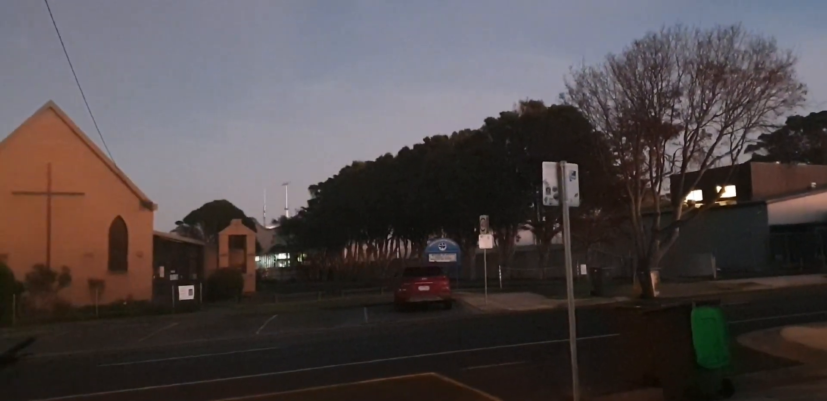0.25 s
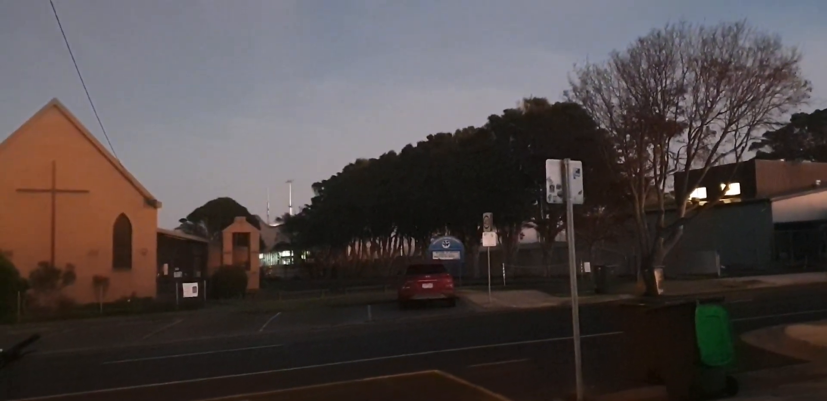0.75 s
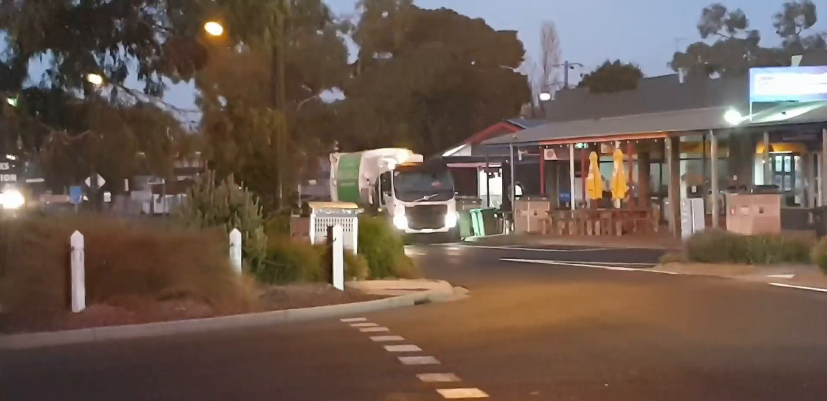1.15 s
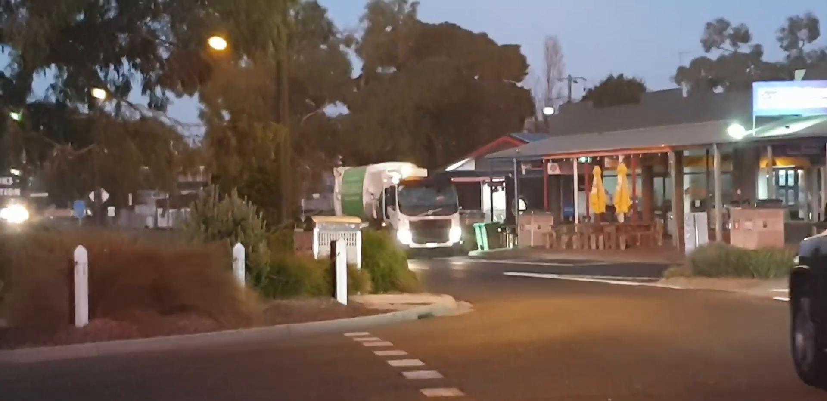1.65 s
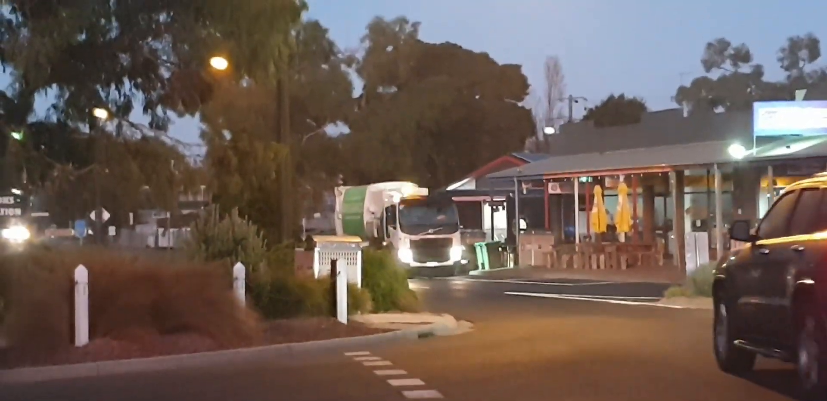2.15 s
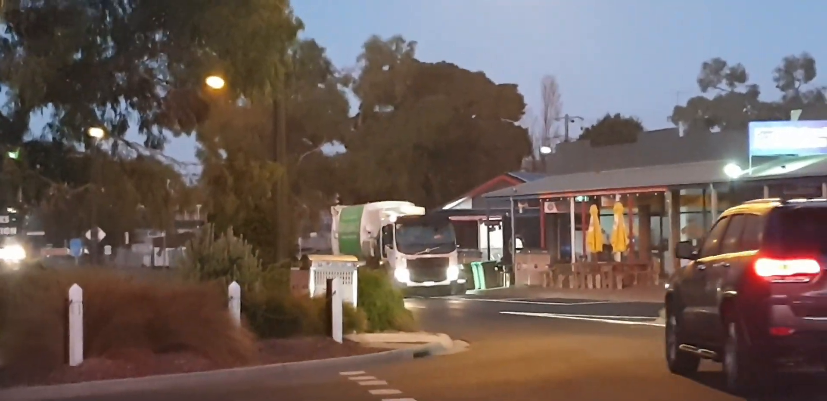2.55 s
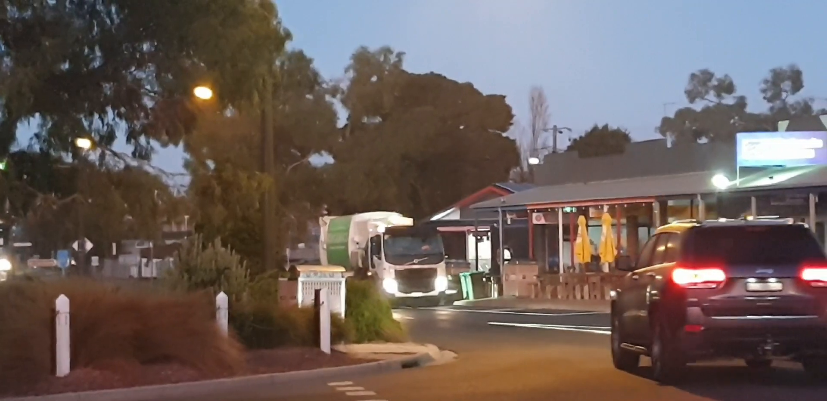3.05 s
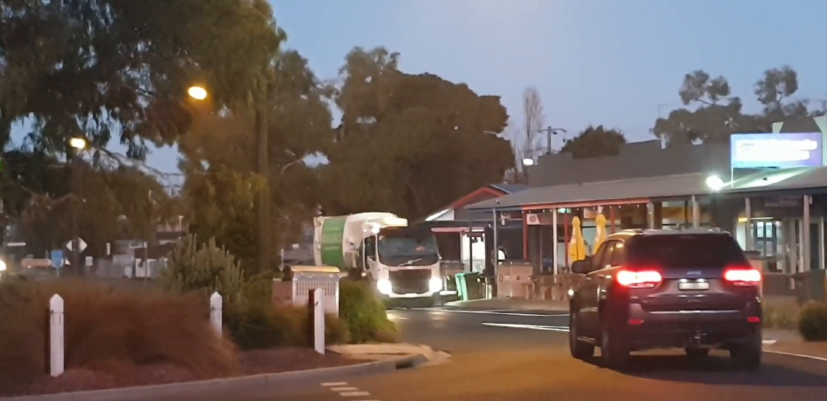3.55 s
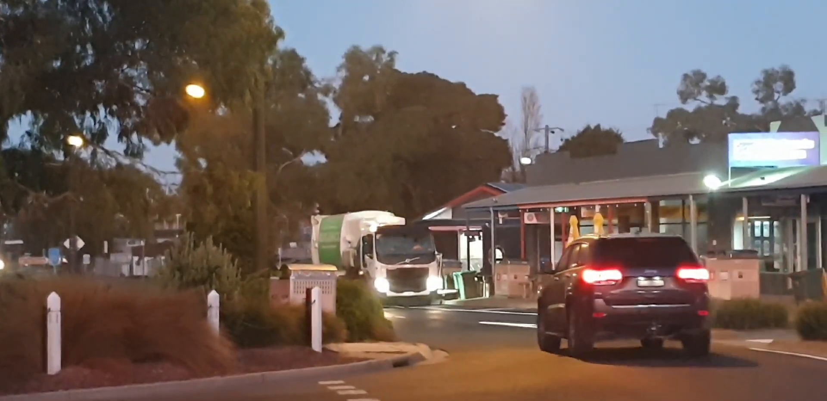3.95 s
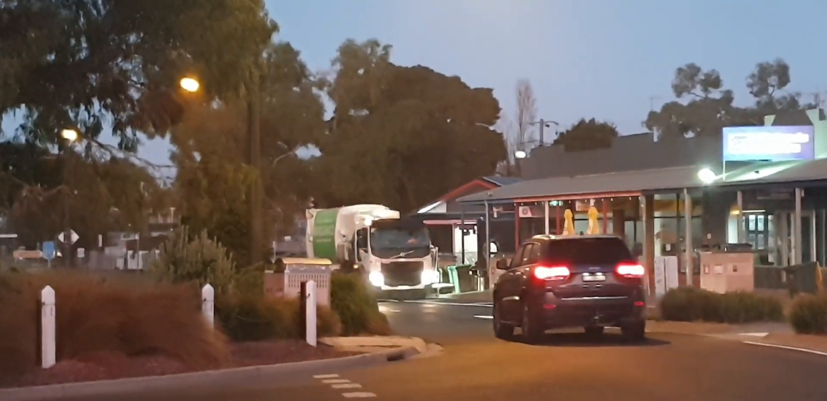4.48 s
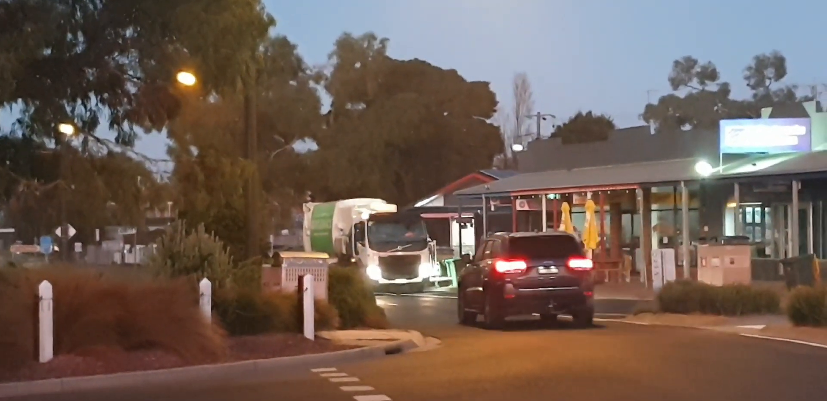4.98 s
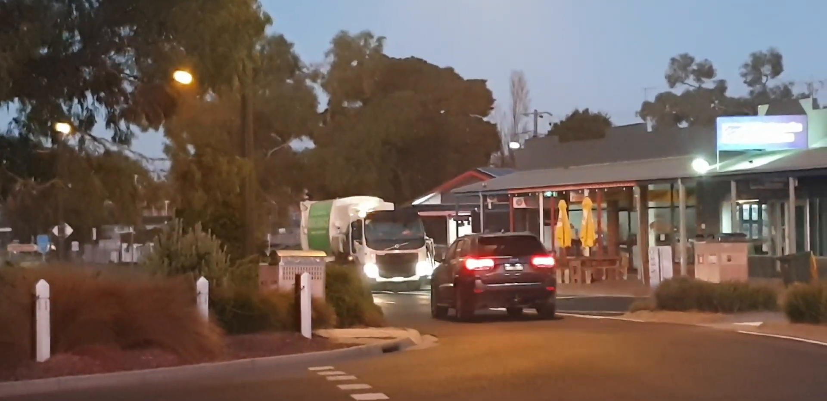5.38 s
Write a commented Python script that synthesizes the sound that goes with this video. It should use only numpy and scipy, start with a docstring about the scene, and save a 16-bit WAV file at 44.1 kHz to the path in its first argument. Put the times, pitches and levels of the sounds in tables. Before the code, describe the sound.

From 0 to about 1.08 seconds a diesel garbage truck accelerates very close by. Its low exhaust boom, around 71 Hz, climbs quickly to roughly 82 Hz, with rough pulsing block roar, rattling panels, bright hiss, brief wavering gear and pump whines, and a faint rising turbo whistle. The noise is wide and leans left. It is chopped off while still revving. After some 0.07 seconds of silence, a much quieter street starts at 1.15: a car draws away with a wavering low drone, rising slightly until 3.5 then dropping and weakening, as tyre hiss fades and the traffic rumble and wash dull. Tiny birds chirp at 2.2-2.4 and 5.4-5.6. Small dry ticks come from 3.35 on, the clearest at 4.57. A far bin knocks hollowly at 4.52 and, longer, at 4.93, with short echoes off buildings. A distant truck hums faintly throughout the street scene.

```python
"""Garbage truck, then a quiet street

A diesel garbage truck pulls away close by: tones locked to its rising firing rate, wavering gear whines,
and noise pulsed by the firings for the block, its panels and the hiss, under a narrow-band turbo whistle.
It cuts off while the revs still climb. After a moment of silence, a second scene: a car draws away through
filtered street noise, its exhaust a wavering drone. Small birds chirp in gliding sines, a far bin and small
ticks ring in decaying modes, and a distant truck hums."""
import sys
import numpy as np
from scipy import signal
from scipy.fft import rfft, irfft
from scipy.io import wavfile
from scipy.ndimage import uniform_filter1d

SR = 44100
rng = np.random.default_rng(int(sys.argv[2]) if len(sys.argv) > 2 else 0)


def dump(signal):
    """Clip the signal to [-1, 1] and save it as 16-bit WAV at the path in sys.argv[1]."""
    limited = np.clip(np.atleast_2d(signal).T, -1, 1)
    pcm = np.round(limited * 32767).astype(np.int16)
    wavfile.write(sys.argv[1], SR, pcm)


N = 247842
TIME = np.arange(N) / SR
HZ = np.fft.rfftfreq(N, 1 / SR)

# weaker engine tones: multiple of the firing rate, level/dB
ENGINE_ORDERS = [(1.832, -39.5), (2.167, -41), (2.833, -41), (3.166, -46.5), (3.333, -40), (3.668, -49),
                 (4.5, -41.5), (4.667, -43.5), (5.58, -33), (6.02, -35.5)]
# spells of pump and gear whine: t/s, length/s, multiple of the firing rate, level at onset/dB, roughness (0-1)
GEAR_WHINES = [(.07, 0.33, 3.51, -29, 0.05), (0.938, 0.17, 3.5, -31.5, 0.25),
               (0.011, 0.083, 14.55, -35.5, 0.3), (0.096, .13, 14.1, -30.5, 0.2),
               (0.22, 0.21, 14.25, -41, 0.1), (.265, 0.13, 22.8, -34, 0.24), (0.393, 0.23, 22.8, -43, 0.3),
               (0.623, 0.18, 22.8, -35.5, 0.23), (0.839, 0.27, 22.72, -36, 0.2),
               (.13, 0.6, 42.45, -50, 0.35)]
# colour of the block roar: f/Hz, relative level/dB
ROAR_COLOUR = [(25, -31), (52, -6.5), (100, -9.5), (130, -11), (205, -2), (380, -3), (520, -3.5),
               (700, -5.5), (920, -8), (1100, -7), (1380, -17.5), (1700, -11.5), (3000, -42)]
# colour of the injector and fan hiss: f/Hz, relative level/dB
HISS_COLOUR = [(700, -19), (1500, -1.5), (2050, 4), (2700, 0), (3450, -2.5), (4100, -1.5), (5000, -4),
               (5900, -8.5), (6500, -4.5), (7400, -7), (8400, -16.5), (10000, -14), (15000, -22)]
# ringing metal panels: f/Hz, width/Hz, level/dB
METAL_PANELS = [(858, 24, -43), (1030, 74, -42.5), (2024, 64, -51.5), (3170, 90, -52.5), (6770, 39, -53.5)]
# the truck's left-right likeness: f/Hz, correlation (0-1)
TRUCK_LIKENESS = [(60, 1), (150, 1), (380, 0.94), (950, 0.51), (2400, 0.33), (6000, .2), (15000, .05)]
# the truck's lean to the left: f/Hz, left minus right level/dB
TRUCK_BALANCE = [(60, -7), (200, 4), (380, 3), (700, 6), (1300, 3), (4400, 7.5), (9000, 9.5)]
# the car's exhaust drone: t/s, f/Hz, level/dB
CAR_DRONE = [(1.14, 59.7, -35), (1.24, 60.9, -34.5), (1.48, 61.9, -42.5), (2.2, 64.4, -37),
             (2.72, 66.3, -38.5), (3.18, 67.4, -36), (3.38, 67.4, -50), (3.54, 67.7, -34.5),
             (4.1, 63.24, -46), (5.62, 64.9, -46.5)]
# colour of the traffic rumble: f/Hz, relative level/dB
RUMBLE_COLOUR = [(20, -28), (32, -17), (45, 0), (62, -3), (84, 4.5), (105, 3), (135, -1), (200, -2),
                 (265, -2), (340, -10), (600, -60.5)]
# colour of the traffic wash: f/Hz, relative level/dB
WASH_COLOUR = [(150, -18), (350, 0), (480, -1), (800, -0.5), (1100, -1.5), (1400, -6.5), (1700, -4),
               (2000, -10.5), (2400, -11), (2700, -13), (3350, -17.5), (3800, -18.5), (4700, -21),
               (6500, -27.5), (9000, -36), (14000, -90)]
# colour of the tyre hiss: f/Hz, relative level/dB
TYRE_COLOUR = [(1500, -20), (3000, -3), (5000, 2.5), (6200, -0.5), (7600, 3), (8800, -2.5), (11000, -2),
               (12500, -8), (15000, -12)]
# the street's left-right likeness: f/Hz, correlation (0-1)
STREET_LIKENESS = [(60, 0.95), (130, 0.97), (290, 0.97), (640, 0.59), (1410, 0.33), (3100, 0.29), (6800, 0)]
# the street's lean to the left: f/Hz, left minus right level/dB
STREET_BALANCE = [(60, 0.5), (380, 4), (1000, 2), (2400, 5), (4400, 7), (15000, 0.5)]
# gentle swells of the traffic wash: t/s, half width/s, peak boost in level/dB
WASH_SWELLS = [(2.598, 0.64, 0.97), (5.45, 0.66, 1.44)]
# knocks of the far bin: t/s, level/dB, factor on the modes' ring time
BIN_KNOCKS = [(4.516, -33.5, 0.28), (4.931, -33, 1)]
# ring modes of the bin: f/Hz, relative level/dB, time to fall 60 dB/s
BIN_MODES = [(620, -5, .08), (788, 4, 0.059), (807, 0, 0.05), (1710, -28, 0.062)]
# small dry ticks: t/s, level/dB, factor on the modes' pitch
DRY_TICKS = [(3.349, -49.5, 1), (3.623, -54, 2.3), (3.751, -57, 2.4), (4.369, -61, 2.2),
             (4.567, -39.5, 0.97), (4.869, -51, 1.4), (5.501, -49, 1.5)]
# ring modes of a tick: f/Hz, relative level/dB, time to fall 60 dB/s
TICK_MODES = [(4020, 0.5, 0.014), (5600, -1, 0.0044), (7300, -5, .006), (9700, -17, .005)]
# bird notes: t/s, length/s, f/Hz, glide/Hz, level/dB
BIRD_NOTES = [(2.228, .021, 4490, -330, -53), (2.249, 0.038, 4620, 80, -59), (2.279, 0.036, 4740, -40, -54),
              (2.336, 0.028, 6420, 100, -65), (2.373, 0.036, 4870, -400, -61),
              (5.398, 0.018, 5780, -40, -65), (5.42, .02, 4400, -350, -60), (5.436, .028, 5920, 50, -67),
              (5.502, .038, 6450, 200, -64), (5.546, 0.047, 4980, -240, -57),
              (5.588, 0.014, 6490, 110, -68)]

TRUCK_ENDS_S, STREET_BEGINS_S = 1.0774, 1.145
# the truck gathers revs, quickly at first: firing rate at the start, rate it nears, time constant
START_HZ, FULL_HZ, REV_UP_S = 71.31, 88.9, 1.2
# exhaust note away from the pipe's resonance, and its octave at the start, which grows with the revs
BOOM_DB, OCTAVE_START_DB, OCTAVE_DB_PER_HZ = -36, -36, 0.43
PIPE_HZ, PIPE_WIDTH_HZ, PIPE_BOOST_DB = 71.7, 3.4, 11.5  # pipe resonance that the revs pass
WHINE_ATTACK_S, WHINE_RELEASE_S, WHINE_SAG_DB = 0.018, 0.053, 2.5
ROAR_DB, HISS_DB = -28.5, -35.5
TURBO_START_HZ, TURBO_RISE_HZ_PER_S, TURBO_DB = 9320, 2050, -57.5
TRUCK_LEAD_S = 0.000404  # the left side hears the engine tones and noise first
CAR_NEAR_M, CAR_M_PER_S = 4.23, 4  # the car draws away at a steady speed
# (level/dB with the car nearest, share of the car's loss with distance)
CAR_OCTAVE_LEVEL = (-37.5, 1.4)
RUMBLE_LEVEL, WASH_LEVEL, TYRE_LEVEL = (-39, 0.23), (-42, 0.25), (-56.5, 1.21)
CAR_FIFTH_TOP_DB, CAR_FIFTH_DB_PER_HZ = -43.5, 1.9  # strongest at top revs
GLANCE_DELAY_S, GLANCE_LIMIT = 0.001267, 0.17  # reflection: its delay, and the gain it grows towards
CHIRP_ARCH_HZ = 70  # each note starts and ends this much below its glide
HUM_HZ, HUM_DB, HUM_FADE_DB = 658, -57.5, 1.5
LOWER_HUM_HZ, LOWER_HUM_DB = 389.3, -62.5
EDGE_HZ = 15500  # cutoff of the low-pass that closes the treble


def firing_hz():
    """The truck's firing rate closes in on full revs."""
    return FULL_HZ + (START_HZ - FULL_HZ) * np.exp(-TIME / REV_UP_S)


def truck_engine():
    """Exhaust orders climb with the revs, and the lowest booms near the pipe's resonance."""
    firing = firing_hz()
    boom_db = BOOM_DB + PIPE_BOOST_DB * np.exp(-((firing - PIPE_HZ) / PIPE_WIDTH_HZ) ** 2)
    octave_db = OCTAVE_START_DB + OCTAVE_DB_PER_HZ * (firing - START_HZ)
    boom = tone(firing, boom_db, waver=0.063, rate_hz=10, apart=0.05)
    octave = tone(2 * firing, octave_db, waver=0.24, rate_hz=7.5, apart=0.069)
    out = placed(boom, lean_db=0.7) + placed(octave, lean_db=4.0)
    for order, db in ENGINE_ORDERS:
        partial = tone(order * firing, db, waver=0.17, rate_hz=6, apart=0.1)
        out += placed(partial, lean_db=1.0)
    return right_later(out, TRUCK_LEAD_S)


def truck_gears():
    """Pump and gears sing out in spells, at multiples of the firing rate."""
    out = np.zeros((2, N))
    for s, length, order, db, rough in GEAR_WHINES:
        t = TIME - s
        hz = order * firing_hz()
        meshing = np.clip(np.minimum(t / WHINE_ATTACK_S, (length - t) / WHINE_RELEASE_S), 0, 1)
        sagging_db = db - WHINE_SAG_DB * np.clip(t / length, 0, 1)
        whine = tone(hz, sagging_db, waver=rough, rate_hz=22, apart=hz / 6000)
        # higher notes are shaded more on the far side
        out += meshing * placed(whine, lean_db=hz.mean() / 400)
    return out


def truck_noise():
    """Each firing shakes the block and its panels; injectors and fan hiss more steadily."""
    turns = np.cumsum(firing_hz()) / SR
    stroke = turns.astype(int)
    cylinder_db = 3.6 * rng.standard_normal(6)[stroke % 6]  # six unequal cylinders
    firing_db = 1.9 * rng.standard_normal(N)[stroke]  # and no two firings alike
    blows = evened(amp(cylinder_db + firing_db) * np.exp(-(turns % 1) / 0.74))
    place = TRUCK_LIKENESS, TRUCK_BALANCE, TRUCK_LEAD_S
    # the number added to the blows is the steady part of each noise
    roar = spread(turbulence(patchy_db=-0.5) * (1.5 + blows), amp(read(ROAR_COLOUR, HZ)), *place)
    hiss = spread(turbulence(patchy_db=0.5) * (8.0 + blows), amp(read(HISS_COLOUR, HZ)), *place)
    out = amp(ROAR_DB) * roar + amp(HISS_DB) * hiss
    for hz, width, db in METAL_PANELS:
        ring = 1 / (1 + 2j * (HZ - hz) / width) ** 2
        shaken = rng.standard_normal((2, N)) * (0.54 + blows)
        out += amp(db) * spread(shaken, ring, *place)
    return out


def truck_turbo():
    """The turbo's hissing whistle, a narrow band of noise, climbs steadily."""
    hz = TURBO_START_HZ + TURBO_RISE_HZ_PER_S * np.minimum(TIME, TRUCK_ENDS_S)
    band = np.array([drift(420), drift(420)])
    return amp(TURBO_DB) * evened(band * np.cos(2 * np.pi * np.cumsum(hz) / SR))


def car():
    """The exhaust drones with a fifth and an octave above, following the pitch of the revs."""
    hz, drone_db = follow(CAR_DRONE)
    fifth_db = CAR_FIFTH_TOP_DB + CAR_FIFTH_DB_PER_HZ * (hz - hz.max())
    drone = tone(hz, drone_db, waver=0.13, rate_hz=31, apart=0.03)
    fifth = tone(1.5 * hz, fifth_db, waver=0.2, rate_hz=7, apart=0.05)
    octave = tone(2 * hz, receding(*CAR_OCTAVE_LEVEL), waver=0.063, rate_hz=9.6, apart=0.055)
    return placed(drone + fifth + octave, lean_db=2.0)


def knocks():
    """A far bin knocks hollowly, and small bright ticks ring out; both are sums of dying modes."""
    t = TIME[:SR // 4]
    hollow, ticks = np.zeros(N), np.zeros(N)
    for s, db, stretch in BIN_KNOCKS:
        onset = 1 - np.exp(-t / (0.0033 * stretch))
        add(hollow, s, amp(db) * struck(BIN_MODES, stretch) * onset)
    for s, db, pitch in DRY_TICKS:
        modes = np.multiply(TICK_MODES, [pitch, 1, 1])
        onset = 1 - np.exp(-t / 0.0006)
        add(ticks, s, amp(db) * struck(modes, 1) * onset)
    return placed(hollow, lean_db=2.5) + placed(ticks, lean_db=6)


def birds():
    """Thin whistles, each a glide with a slight arch."""
    out = np.zeros(N)
    for s, length, pitch_hz, glide_hz, db in BIRD_NOTES:
        u = np.linspace(-1, 1, int(length * SR))  # from the note's start to its end
        hz = pitch_hz + glide_hz * u / 2 - CHIRP_ARCH_HZ * u ** 2
        whistle = np.sqrt(2) * np.sin(2 * np.pi * np.cumsum(hz) / SR)
        add(out, s, amp(db) * whistle * signal.windows.tukey(len(u), 0.35))
    quaver = amp(2 * drift(70))
    return placed(out * quaver, lean_db=9)


def street():
    """Rumble and wash of traffic, and tyre hiss that fades fastest, so the noise dulls with distance."""
    place = STREET_LIKENESS, STREET_BALANCE
    rumble = spread(turbulence(patchy_db=0.7), amp(read(RUMBLE_COLOUR, HZ)), *place)
    wash = spread(turbulence(patchy_db=0.84), amp(read(WASH_COLOUR, HZ)), *place)
    tyres = spread(turbulence(patchy_db=2.5), amp(read(TYRE_COLOUR, HZ)), *place)
    swell_db = sum(db * np.exp(-((TIME - s) / width) ** 2) for s, width, db in WASH_SWELLS)
    out = amp(receding(*RUMBLE_LEVEL)) * rumble
    out += amp(receding(*WASH_LEVEL) + swell_db) * wash
    out += amp(receding(*TYRE_LEVEL)) * tyres
    return out


def far_truck():
    """The distant truck's machinery holds two faint notes; the upper one fades in and out."""
    upper_db = HUM_DB + HUM_FADE_DB * drift(0.52)
    upper = tone(np.full(N, HUM_HZ), upper_db, waver=0.16, rate_hz=9.4, apart=0.11)
    lower = tone(np.full(N, LOWER_HUM_HZ), LOWER_HUM_DB, waver=0.18, rate_hz=18, apart=0.2)
    return placed(upper + lower, lean_db=0.5)


def glancing(x):
    """One close reflection combs the noise hollow, growing as the car draws away."""
    share = GLANCE_LIMIT * (1 - amp(receding(0, 0.5)))
    return x + share * irfft(rfft(x) * np.exp(-2j * np.pi * HZ * GLANCE_DELAY_S), N)


def shopfronts(x, t60, wet_db):
    """A thin tail of scattered echoes from the buildings."""
    t = TIME[:SR // 2]
    scattered = rng.standard_normal((2, len(t))) * (rng.random((2, len(t))) < 0.04)
    taps = scattered * amp(-60 * t / t60) * (t > 0.008)
    echoes = signal.fftconvolve(x, taps / np.linalg.norm(taps[0]), axes=1)[:, :N]
    return x + amp(wet_db) * echoes


def receding(near_db, share):
    """The level in dB of a sound that fades as the car draws away."""
    distance = CAR_NEAR_M + CAR_M_PER_S * np.maximum(TIME - STREET_BEGINS_S, 0)
    return near_db - share * 20 * np.log10(distance / CAR_NEAR_M)


def tone(hz, db, waver, rate_hz, apart):
    """A machine tone whose strength and phase waver; echoes set the two ears apart."""
    shared = 1 + waver * (drift(rate_hz) + 1j * drift(rate_hz))
    echoes = apart * (drift(rate_hz) + 1j * drift(rate_hz))
    turn = np.exp(2j * np.pi * (np.cumsum(hz) / SR + rng.random()))
    return amp(db) * np.sqrt(2) * (np.array([shared + echoes, shared - echoes]) * turn).real


def struck(modes, stretch):
    """The dying ring of a struck object, one sine a mode."""
    t = TIME[:SR // 4]
    return sum(amp(db - 60 * t / (t60 * stretch)) * np.sin(2 * np.pi * hz * t) for hz, db, t60 in modes)


def turbulence(patchy_db):
    """Two white noises that swell and fade together in patches of time and pitch."""
    z = signal.stft(rng.standard_normal((2, N)), nperseg=512)[2]
    patches = rng.standard_normal(z.shape[1:])
    patches = uniform_filter1d(patches, size=7, axis=0)  # across pitch
    patches = uniform_filter1d(patches, size=9, axis=1)  # across time
    return signal.istft(z * amp(patchy_db * patches / patches.std()), nperseg=512)[1][:, :N]


def spread(pair, gain, same, lean, lead_s=0):
    """Colours two unrelated signals and blends them into a left and a right."""
    a, b = rfft(pair)
    likeness, lean_db = np.clip(read(same, HZ), -1, 1), read(lean, HZ)
    right = likeness * a + np.sqrt(1 - likeness ** 2) * b
    right = right * np.exp(-2j * np.pi * HZ * lead_s)  # the right side lags
    sides = np.array([a * amp(lean_db / 2), right * amp(-lean_db / 2)])
    return evened(irfft(sides * gain, N))


def placed(x, lean_db):
    """Sets a sound to the left of the middle."""
    return x * amp([[lean_db / 2], [-lean_db / 2]])


def right_later(x, lead_s):
    """Delays the right channel."""
    return np.array([x[0], irfft(rfft(x[1]) * np.exp(-2j * np.pi * HZ * lead_s), N)])


def drift(rate_hz):
    """Slow random motion of rms 1."""
    return evened(irfft(rfft(rng.standard_normal(N)) / (1 + (HZ / rate_hz) ** 4), N))


def evened(x):
    """Scales a sound so that the middle of its channels has rms 1."""
    return x / np.sqrt(np.mean(np.atleast_2d(x).mean(0) ** 2) + 1e-20)


def amp(db):
    """Decibels to gain."""
    return 10 ** (np.asarray(db) / 20)


def read(points, hz):
    """Reads a spectrum on a log-frequency axis."""
    f, value = np.transpose(points)
    return np.interp(np.log(hz + 1), np.log(f + 1), value)


def follow(rows):
    """The columns of a timed table, one value a sample."""
    s, *columns = np.transpose(rows)
    return [np.interp(TIME, s, column) for column in columns]


def add(mix, s, sound):
    """Mixes a short sound in at a time."""
    part = mix[round(s * SR):][:len(sound)]
    part += sound[:len(part)]


def scene():
    """The close truck scene cuts off, and the street scene begins after a brief silence."""
    near = np.clip((TRUCK_ENDS_S - TIME) / 0.002, 0, 1)
    tail = amp(-16) * np.exp(-np.maximum(TIME - TRUCK_ENDS_S, 0) / 0.0053)
    far = np.clip((TIME - STREET_BEGINS_S) / 0.0011, 0, 1)
    truck = truck_engine() + truck_gears() + truck_noise() + truck_turbo()
    small_sounds = shopfronts(knocks() + birds(), t60=0.17, wet_db=-7.5)
    outdoors = car() + small_sounds + glancing(street()) + far_truck()
    return np.maximum(near, tail) * truck + far * outdoors


def record(dry):
    """A steep low-pass closes off the very top of the treble."""
    low_pass = signal.firwin(511, EDGE_HZ, window=("kaiser", 9), fs=SR)
    return signal.oaconvolve(dry, low_pass[None], "same")


dry = scene()
out = record(dry)
dump(out)
```